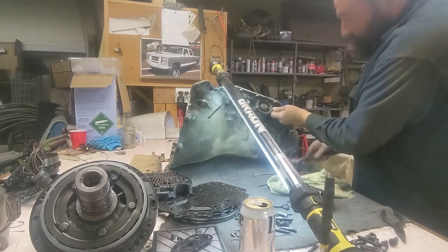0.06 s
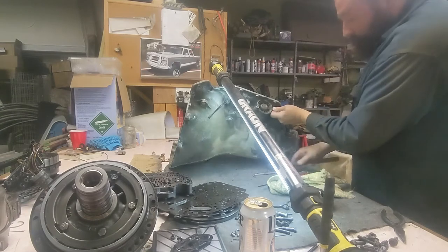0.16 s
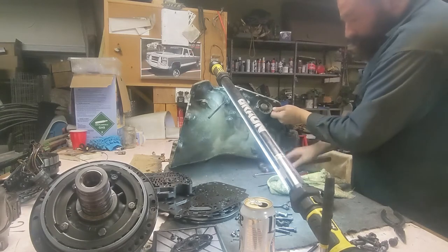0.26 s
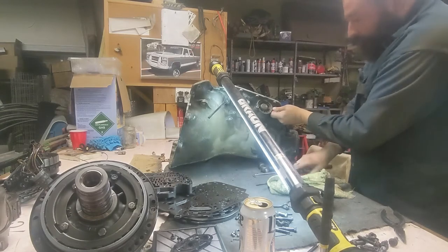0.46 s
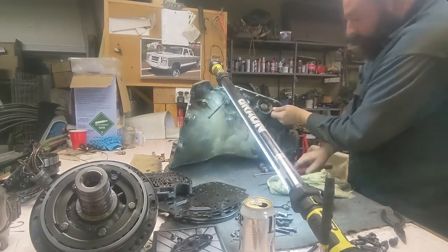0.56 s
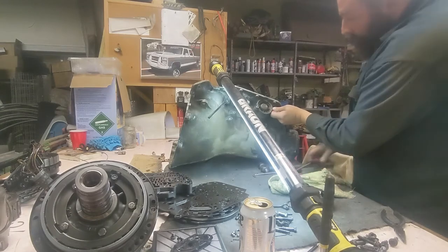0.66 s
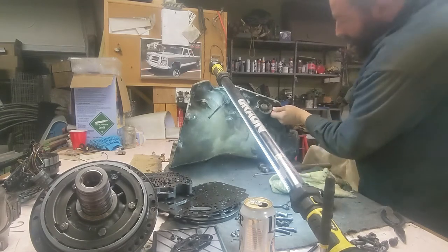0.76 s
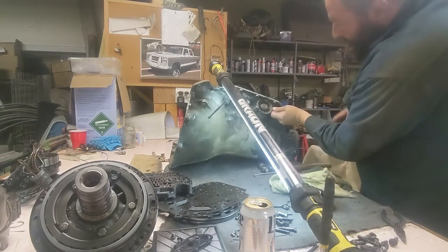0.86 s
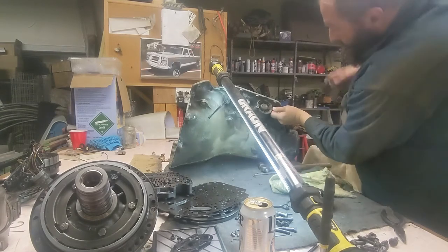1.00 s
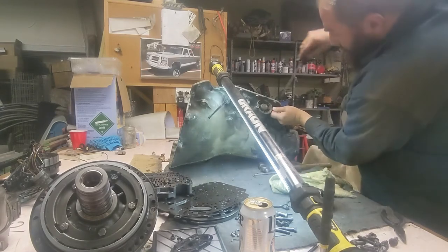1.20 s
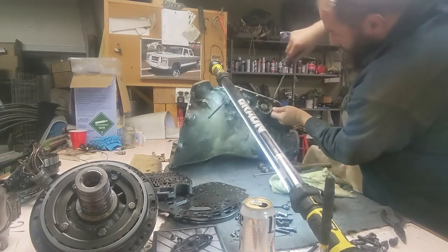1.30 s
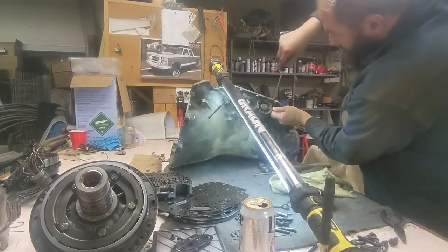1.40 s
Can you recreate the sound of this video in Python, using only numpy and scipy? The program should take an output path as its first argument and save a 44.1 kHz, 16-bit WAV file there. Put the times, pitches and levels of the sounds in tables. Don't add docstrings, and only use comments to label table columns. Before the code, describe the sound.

A metal tool knocks and lands hard on a workbench, then rattles and scrapes faintly.

```python
import sys
import numpy as np
from scipy import signal
from scipy.fft import rfft, irfft, next_fast_len
from scipy.io import wavfile
from scipy.ndimage import map_coordinates

SR = 44100
rng = np.random.default_rng(int(sys.argv[2]) if len(sys.argv) > 2 else 0)


def ratio_of_db(decibels):
    return 10 ** (np.asarray(decibels, float) / 20)


def file_out(sig):
    cols = np.atleast_2d(sig).T
    lim = np.clip(cols, -1, 1)
    pcm = np.round(lim * 32767).astype(np.int16)
    wavfile.write(sys.argv[1], SR, pcm)


N = 63945


def seconds():
    return np.arange(N) / SR


def unit(x):
    return x / np.sqrt(np.mean(x ** 2) + 1e-20)


def along(points, hz):
    f, v = np.transpose(points)
    return np.interp(np.log(hz + 1), np.log(f + 1), v)


def closed(points):
    below = (points[0][0] / 2, -120)
    above = (points[-1][0] * 1.05, -120)
    return lambda hz: ratio_of_db(along([below, *points, above], hz))


def filtered(x, response):
    m = next_fast_len(x.shape[-1] + SR // 2)
    spectrum = rfft(x, m) * response(np.fft.rfftfreq(m, 1 / SR))
    return irfft(spectrum, m)[..., :x.shape[-1]]


def low_cut(hz, corner_hz, damping):
    f = hz / corner_hz
    return ((1j * f) ** 2 / (1 + damping * 1j * f - f ** 2)) ** 2


def wobble(rate_hz):
    knots = rng.standard_normal(int(N * rate_hz / SR) + 4)
    return map_coordinates(knots, [np.arange(N) * rate_hz / SR])


# pitch_hz, correlation
PORT_LIKENESS = [(100, 0.88), (300, 1), (700, -0.099), (1300, -0.00077), (3000, -0.041)]


def paired(pair):
    def mid_side(hz):
        angle = np.arccos(np.clip(along(PORT_LIKENESS, hz), -1, 1)) / 2
        return np.array([np.cos(angle), np.sin(angle)])

    mid, side = filtered(pair, mid_side)
    return np.array([mid + side, mid - side])


def rush(points, spiky_db=0.0):
    grain = ratio_of_db(spiky_db * wobble(700))
    return unit(paired(filtered(rng.standard_normal((2, N)) * grain, closed(points))))


def swells(rows):
    t = seconds()
    return sum(ratio_of_db(db) * np.exp(-.5 * ((t - centre) / half_width) ** 2) for centre, half_width, db in rows)


# pitch_hz, level_db per Hz
RUMBLE_TONE = [(15, -50.5), (45, -1), (82, -2.5), (140, -6), (200, -14.5), (281, -8.5), (325, -22),
               (352, -13.5), (430, -17), (600, -22), (780, -41), (1320, -120)]
# pitch_hz, level_db per Hz
HISS_TONE = [(500, -6), (700, -3), (1320, -2), (1600, -8.5), (2300, -5.5), (6000, -14), (11000, -19),
             (16000, -23)]


def background():
    unrest_db = 2 * wobble(13.84) + .5 * wobble(3.6)
    rumble = unit(ratio_of_db(unrest_db) * rush(RUMBLE_TONE))
    hiss = ratio_of_db(-59.5 + 0.41 * wobble(18)) * rush(HISS_TONE)
    return ratio_of_db(-54) * rumble + hiss


# pitch_hz, t60_s
ROOM_DECAY = [(100, 0.44), (300, 0.42), (1000, 0.3), (3000, 0.43), (8000, 0.23)]


def garage(x):
    hz, t, grains = signal.stft(rng.standard_normal((2, SR // 2)), SR, nperseg=256)
    decay = ratio_of_db(-60 * t / along(ROOM_DECAY, hz)[:, None])
    tail = paired(signal.istft(grains * decay, SR, nperseg=256)[1])
    late = np.pad(x.mean(0), (250, 0))[None]
    return signal.fftconvolve(late, tail / np.linalg.norm(tail[0]), axes=1)[:, :N]


# centre_s, half_width_s, level_db
DRAG_SWELLS = [
    (.3, 0.06, -48.5),
    (.6, 0.033, -53),
    (.795, 0.017, -65),
    (1.02, 0.044, -49.5),
    (1.365, .015, -61),
]
# pitch_hz, level_db per Hz
DRAG_COLOUR = [(200, -9), (620, 4.5), (900, -9), (1250, 2), (1700, -7), (4000, -7.5), (7500, -17),
               (12000, -29)]
# centre_s, half_width_s, level_db
FIZZ_SWELLS = [(.1, 0.19, -66.5), (.23, 0.035, -65), (.345, 0.034, -53), (.5, .02, -63.5),
               (.6, 0.022, -69), (.79, 0.02, -64), (.92, 0.12, -67.5), (1.05, 0.028, -64.5),
               (1.2, 0.024, -66), (1.3, 0.085, -67), (1.43, .04, -69.5)]
# pitch_hz, level_db per Hz
FIZZ_COLOUR = [(6000, -9.5), (9000, -12.5), (12000, -13), (15000, -3), (16000, -5.5)]


def drag_and_fizz():
    drag = swells(DRAG_SWELLS) * rush(DRAG_COLOUR, spiky_db=1.5)
    fizz = swells(FIZZ_SWELLS) * rush(FIZZ_COLOUR, spiky_db=2.0)
    return drag + fizz


# time_s, pitch_hz, level_db
SINGING = [(.74, 2300, -75), (.78, 2350, -80), (.8, 2300, -72), (.832, 2380, -63), (0.853, 2280, -63.5),
           (.882, 2241, -57.5), (.914, 2243, -62.5), (.932, 2235, -62), (0.957, 2260, -64.5),
           (.985, 2400, -67), (1.019, 2240, -61.5), (1.085, 2250, -65.5), (1.12, 2231, -69),
           (1.2, 2260, -77.5)]


def sing():
    s, hz, db = np.transpose(SINGING)
    t = seconds()
    pitch_hz = np.interp(t, s, hz) + 40 * wobble(150)
    level_db = np.interp(t, s, db, left=-140, right=-140) + 3.94 * wobble(69.97)
    phase = 2 * np.pi * np.cumsum(pitch_hz) / SR
    return ratio_of_db(level_db) * np.sin(phase + np.array([[0], [.9]]))


# start_s, level_db, t60_s
BUZZ = (.476, -31, 0.43)
# pitch_hz, level_db per Hz
BUZZ_TONE = [(150, -3.5), (270, 0), (524, -12.5), (782, -10), (1000, -18.5), (2270, -20), (6000, -42.5)]


def shudder():
    start, db, t60 = BUZZ
    t = seconds() - start
    onset = np.clip(t / 0.0037, 0, 1)
    lumpy_db = db - 60 * t / t60 + 1.234 * wobble(110)
    return onset * ratio_of_db(lumpy_db) * rush(BUZZ_TONE, spiky_db=1.7)


# time_s, level_db, t60_s
TOUCHES = [
    (.2205, -45, 0.021),
    (0.3148, -28.5, .012),
    (0.4039, -36, 0.014),
    (.4705, -36.5, 0.0041),
]
# pitch_hz, level_db per Hz
TOUCH_TONE = [(590, -34), (1000, -6), (6940, -17), (8360, -23), (9720, -17), (16000, -24)]


def ticks():
    t = seconds()
    shape = sum(ratio_of_db(db - 60 * np.abs(t - s) / np.where(t < s, .003, t60)) for s, db, t60 in TOUCHES)
    return shape * rush(TOUCH_TONE)


# time_s, level_db
SCRAPE_PRESSURE = [
    (.4015, -61),
    (.4035, -30.5),
    (.409, -31),
    (.418, -27),
    (.436, -29),
    (.456, -32),
    (.468, -35),
    (.49, -70),
    (.53, -120),
]
# pitch_hz, level_db per Hz
FRICTION_TONE = [(250, -7.5), (700, -3), (1500, -4), (2500, -6), (4500, -12), (7700, -29.5), (11000, -40.5),
                 (16000, -41.5)]
# pitch_hz, width_hz, gain_db
STEEL_RINGS = [(2265, 50, 9), (3185, 70, 7), (4110, 40, 5), (4970, 40, 6), (8260, 40, 19), (9620, 80, 8),
               (11900, 50, 15), (14200, 50, 8), (14900, 70, 12)]


def scrape():
    pressure_db = np.interp(seconds(), *np.transpose(SCRAPE_PRESSURE), left=-140, right=-140)
    friction = ratio_of_db(pressure_db + 1.2 * wobble(90.7)) * rush(FRICTION_TONE)

    def steel(f):
        return 1 + sum(ratio_of_db(gain_db) * 1j * f * width / (centre ** 2 - f ** 2 + 1j * f * width)
                       for centre, width, gain_db in STEEL_RINGS)

    return filtered(friction, steel)


# start_s, level_db, pitch_hz, t60_s, rise_s
PART_RINGS = [(.2235, -7, 1032, .042, .004), (.2229, -9.5, 922, .045, 0.0059),
              (.2237, -13.5, 660, .05, .003), (.2229, -15, 748, .055, .004), (.2215, -5.5, 1922, .04, .004),
              (.2185, -38, 4235, .04, .002), (.2185, -31, 2400, .03, .002), (.223, -14, 268, .06, .005),
              (0.25, -35, 1960, .04, .003), (.239, -57, 4240, .05, .003), (.2425, -34, 750, .04, .003),
              (.3143, -1.5, 243, .035, .006), (.3505, -17.5, 76, .07, 0.0021), (.47, 3, 312, .03, .004),
              (.479, -12.5, 1060, .04, .003), (.484, -17, 1270, .03, .002), (.489, -8, 275, .04, .005),
              (.497, -13, 500, .04, .004), (.51, -29.5, 700, .05, .004), (.508, -40, 2300, .03, .003),
              (0.95, -47, 708, 0.065, 0.0039), (0.95, -42, 275, 0.093, 0.0047),
              (1.352, -44.5, 710, 0.074, 0.0043), (1.27, -43.5, 300, .08, .005)]
# start_s, level_db, pitch_hz, t60_s
SOFT_THUDS = [(0.247, -32, 69.1, 0.22), (.313, -36.5, 554, 0.084), (0.3233, -4, 99.3, 0.032),
              (.324, -32.5, 369, 0.085), (0.3447, -16.5, 149.9, 0.033), (.356, -31.5, 280, .06),
              (.378, -28.5, 90.4, .08), (.39, -31.5, 170, .1), (.405, -34.5, 75, 0.3),
              (0.421, -35.5, 170, 0.11), (.487, -27.5, 208, 0.12), (0.489, -29.5, 75.3, .17),
              (0.546, -42.5, 278, 0.22), (.595, -43, 185.2, 0.27), (0.886, -38, 74.7, 0.14),
              (.895, -43, 214.4, 0.12)]


def thuds():
    rows = [*PART_RINGS, *[(*row, 0.41 / row[2]) for row in SOFT_THUDS]]
    s, db, hz, t60, rise = np.transpose(rows)[:, :, None]
    t = np.maximum(seconds() - s, 0)
    swing = ratio_of_db(db - 60 * t / t60) * np.sin(2 * np.pi * hz * t) * (1 - np.exp(-t / rise)) ** 2
    return -swing.sum(0) * np.ones((2, 1))


def struck(rows, modes, scatter_db, attack_s, detune=0):
    out = np.zeros((2, N + SR))
    t = np.arange(SR // 3) / SR
    hz, level_db, t60 = np.transpose(modes)[:, :, None]
    luck = rng.standard_normal((30, 4, len(modes), 1))
    for (s, db), (both, off, left, right) in zip(rows, luck):
        start = round(s * SR)
        wave = np.sin(2 * np.pi * hz * (1 + detune * off) * t) * (1 - np.exp(-t / attack_s)) ** 2
        for port, own in enumerate((left, right)):
            scatter = scatter_db * (both + own * np.minimum(hz / 1500, 1))
            ring = ratio_of_db(level_db + scatter - 60 * t / t60) * wave
            out[port, start:start + len(t)] -= ratio_of_db(db) * ring.sum(0)
    return out[:, :N]


# time_s, level_db
KNOCK_CONTACTS = [
    (.2190, -31),
    (.2216, -25),
    (.2245, -23.5),
    (.2274, -18),
    (.2352, -27.5),
    (.2445, -31.5),
]
# pitch_hz, level_db, t60_s
KNOCK_RINGS = [(425, -4, 0.019), (700, -11.5, .03), (1030, -6, .02), (1148, -7.5, 0.035),
               (1370, -3.5, .025), (2142, -11, .025), (3310, -20, .025), (3470, -21.5, .02),
               (4235, -26.5, 0.0307)]
# time_s, level_db
BLOW_CONTACTS = [
    (.4615, -18.5),
    (.4645, -16),
    (.4678, -8.5),
    (.4695, 3),
    (.4768, -12),
]
# pitch_hz, level_db, t60_s
BLOW_RINGS = [(215, -23.5, 0.024), (310, -28.5, .05), (652.7, -1.5, 0.023), (718, -5, 0.027),
              (802, -8, .024), (1040, -6, .018), (1275, -14.5, .016), (1680, -15.5, .012),
              (1890, -11, .014), (2200, -16.5, .012), (3120, -24.5, .014)]
# time_s, level_db
REBOUNDS = [
    (.4835, -13),
    (.4915, -29.5),
    (.503, -33.5),
    (.519, -35.5),
    (.533, -37),
    (.547, -40),
    (.797, -48),
    (1.36, -50.5),
]


def knocks():
    knock = struck(KNOCK_CONTACTS, KNOCK_RINGS, scatter_db=5.0, attack_s=0.00042, detune=.003)
    blow = struck(BLOW_CONTACTS, BLOW_RINGS, scatter_db=3.0, attack_s=0.00064)
    rebounds = struck(REBOUNDS, BLOW_RINGS, scatter_db=6, attack_s=.0012, detune=.12)
    tool = filtered(knock + blow + rebounds, lambda hz: low_cut(hz, corner_hz=170, damping=1.2))
    return tool + thuds()


def scene():
    lag_s, room_db = .0003, -12
    knock_share = .33
    sides = np.array([[-1], [1]])
    hits = filtered(knocks(), lambda hz: np.exp(1j * np.pi * hz * lag_s * sides))
    rub = ticks() + scrape()
    room = ratio_of_db(room_db) * garage(knock_share * hits + rub)
    return background() + drag_and_fizz() + sing() + shudder() + room + rub + hits


def band_limit(x):
    return signal.sosfilt(signal.butter(12, 16680, fs=SR, output="sos"), x)


def record(dry):
    def microphone(hz):
        return np.clip((15900 - hz) / 100, 0, 1) * low_cut(hz, corner_hz=40, damping=1.4)

    x = filtered(dry, microphone)
    mix = x / (1 + np.abs(x) ** 8) ** (1 / 8)
    return band_limit(mix)


dry = scene()
out = record(dry)
file_out(out)
```